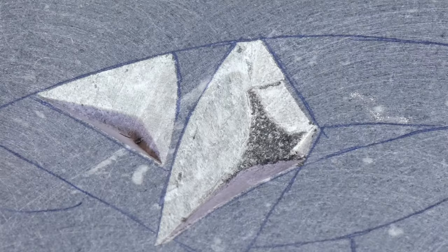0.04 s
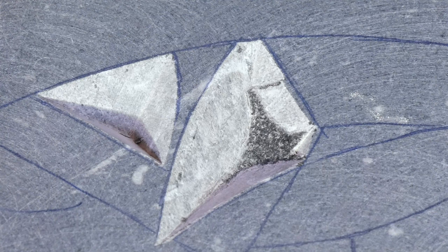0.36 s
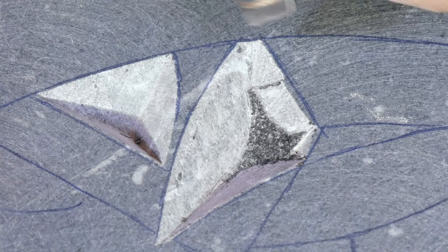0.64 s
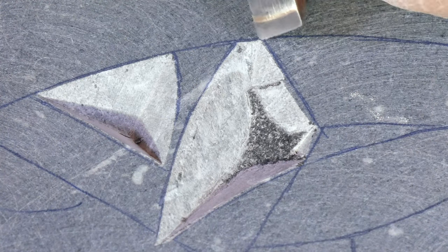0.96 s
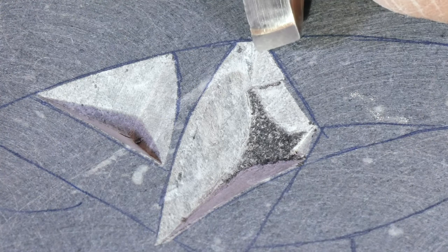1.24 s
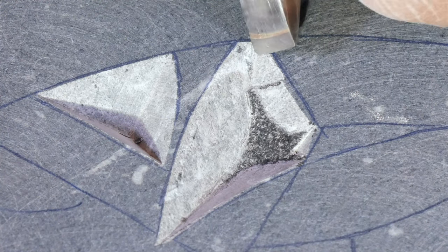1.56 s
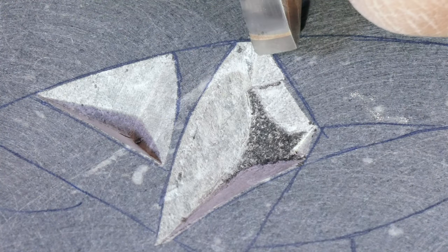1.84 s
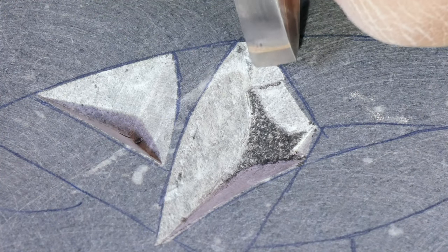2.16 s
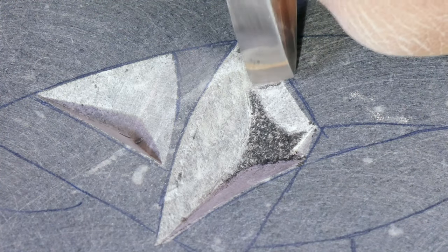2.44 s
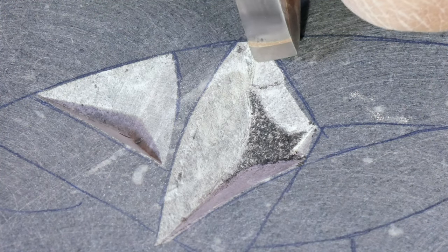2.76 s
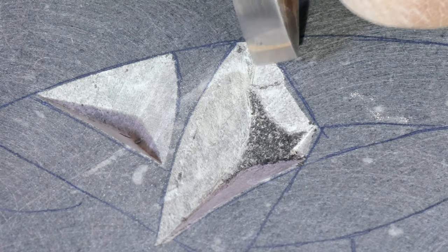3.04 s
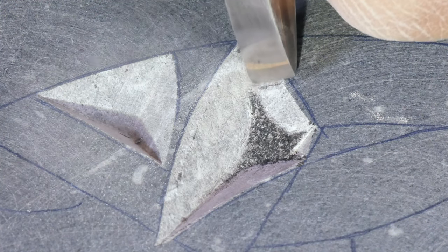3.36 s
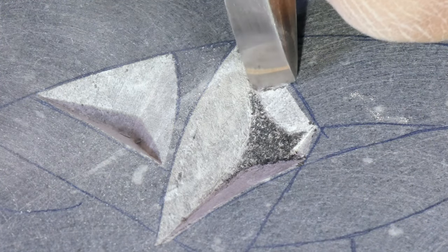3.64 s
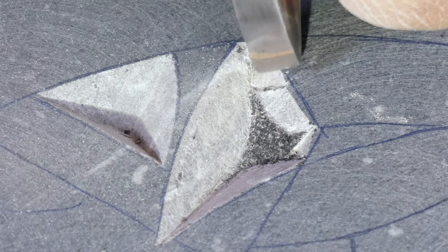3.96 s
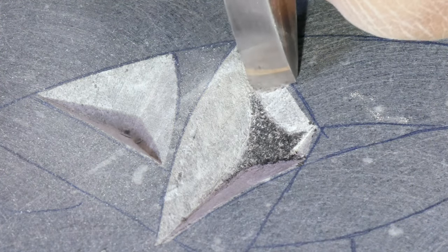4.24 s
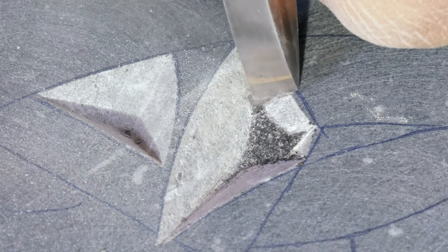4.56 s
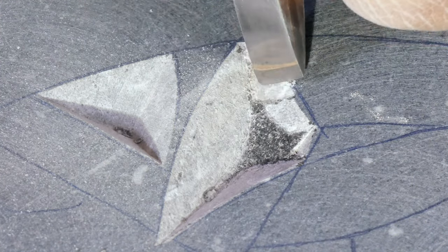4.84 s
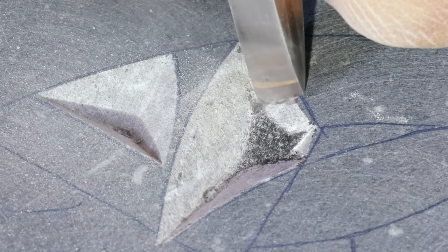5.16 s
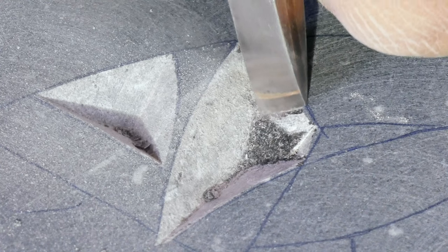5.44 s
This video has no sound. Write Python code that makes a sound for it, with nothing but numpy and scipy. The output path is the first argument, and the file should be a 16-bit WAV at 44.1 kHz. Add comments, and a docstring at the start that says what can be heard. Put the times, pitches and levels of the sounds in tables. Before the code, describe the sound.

A faint air hum gives way to a close pneumatic chisel rattling against stone in three bursts, with bright metallic ringing and hiss.

```python
"""A quiet air machine hums, with wisps of hiss, a thin whistle and two light handling scrapes.
Then a pneumatic hammer drives a steel chisel into stone in three bursts, close by in a small workshop.
Each piston stroke rings the chisel, the exhaust hisses and puffs, and the piston knocks back;
the loose shank rattles when the tool lifts."""
import sys
import numpy as np
from scipy import signal
from scipy.fft import rfft, irfft
from scipy.io import wavfile
from scipy.ndimage import uniform_filter1d

SR = 44100
rng = np.random.default_rng(int(sys.argv[2]) if len(sys.argv) > 2 else 0)


def unload_wav(signal):
    """Save mono or channel-first audio to the path in sys.argv[1] as 16-bit WAV at rate SR, clipped to [-1, 1]."""
    wavfile.write(
        sys.argv[1],
        SR,
        np.round(np.clip(np.atleast_2d(signal).T, -1, 1) * 32767).astype(np.int16),
    )


N = 250929
SIZE = 2048  # samples in one hit
HZ, T = np.fft.rfftfreq(SIZE, 1 / SR), np.arange(N) / SR
TILT_OCTAVES = np.log2(np.maximum(HZ, 1500) / 6000)  # brightness pivots at 6 kHz

# piston pace, one curve per push into the stone, from first bite to lift: time_s, strokes_per_s
PISTON_PACE = [
    [(1.9879, 38.8), (2.05, 29.9), (2.21, 37.0)],
    [(2.2252, 41.1), (2.44, 45.1), (2.56, 31.8), (2.61, 22.9)],
    [(3.0514, 35.4), (3.12, 44.0), (3.27, 37.6), (3.31, 43.6), (3.55, 49.8), (3.67, 29.9), (3.74, 16.6)],
    [(4.0221, 44.4), (4.14, 39.7), (4.22, 42.0)],
    [(4.239, 44.9), (4.3, 51.8), (4.38, 43.7), (4.44, 49.7), (4.61, 48.9), (4.76, 36.7), (4.79, 28.3),
     (4.94, 23.5)],
    [(4.9863, 43.7), (5.04, 50.2), (5.12, 43.1), (5.3, 50.1), (5.43, 43.9), (5.51, 45.2), (5.56, 32.7),
     (5.69, 28.9)],
]
# air valve openings: open_s, attack_s, ease_off_s, release_s,
# hiss_db, hiss_after_db, puff_db, puff_after_db
VALVE_OPENINGS = [(1.91, 0.044, 2.632, 0.16, -32.5, -63.5, -31, -63),
                  (2.921, 0.072, 3.723, 0.14, -32.5, -60.5, -32.5, -68),
                  (3.932, 0.056, 4.75, 0.187, -32.5, -53, -36.5, -39.5),
                  (4.9, 0.03, 5.45, 0.19, -36, -52.5, -48, -45)]
AIR_ON_S = VALVE_OPENINGS[0][0]
# fade of the idling air machine: time_s, level_db
HUM_FADE = [(.55, -51), (.95, -56), (1.3, -59), (1.85, -62)]


def chisel(level_db=22.0, lead_s=.00035, drift=0.0025, uneven_db=1.45):
    """Each blow rings the chisel's resonances; their mix follows how the edge sits in the stone."""
    # resonances, by how much edge cuts: pitch_hz, width_hz, corner_db, half_edge_db, full_edge_db
    resonances = [(1140, 420, 2.5, 0, 1), (1980, 660, 2, -1.5, -2.5), (3390, 530, 5.5, 5.5, 6.5),
                  (4460, 170, 6, 8.5, 2), (5074, 470, 13, 14.5, 11.5), (7660, 200, 5, 11, 8.5),
                  (8340, 1150, 0, 6, 10.5), (9790, 260, 7, 8, 12), (10520, 164, -8, 5, 13.5),
                  (11930, 1100, 9.5, 4, -5), (12180, 470, 0, 7.5, 14), (13040, 630, 3, 12.5, 13.5),
                  (13700, 280, 5, 0, -3), (14580, 280, 17, 9, 14.5)]
    # narrow dips and one small peak in the chisel's ring: pitch_hz, width_hz, gain_db
    ring_eq = [(1560, 200, -2.5), (2570, 330, -6.5), (3960, 150, 5), (7840, 91, -23), (9160, 120, -4),
               (11740, 110, -2)]
    # how much of the edge is in the stone: time_s, share (0-1)
    seating = [(2.55, 0.06), (3.05, 0.47), (3.6, 0.58), (4.05, 0.94), (5.47, 0.97)]
    out = np.zeros(N)
    hz, width, corner_db, half_db, edge_db = np.transpose(resonances)
    eq_db = sum(db / (1 + (2 * (HZ - f) / w) ** 2) for f, w, db in ring_eq)
    for s, db, brightness in blows():
        seat = np.clip(curve(seating, s), 0, 1)
        mix_db = half_db + abs(2 * seat - 1) * ((edge_db if seat > .5 else corner_db) - half_db)
        # the changing contact with the stone pulls and damps each resonance a little
        pull, damp = rng.standard_normal((2, len(hz)))
        offset_hz = HZ[:, None] - hz * (1 + drift * pull)
        peaks = 1 / (1 + (offset_hz / (0.87 * width)) ** 2) ** 2
        body_db = 10 * np.log10(peaks @ amp(mix_db + uneven_db * damp) ** 2) + eq_db
        add(out, s - lead_s, amp(db + level_db) * ring(strike(), body_db + brightness * TILT_OCTAVES))
    return out


def strike(contact_s=0.0007, smear_s=0.0002, scatter_s=0.0029, scatter_db=-5.5):
    """One piston blow: a hard click, smeared as it runs down the steel, then scatter off the slab."""
    delay_s = contact_s + smear_s * unit_rms(uniform_filter1d(rng.standard_normal(len(HZ)), size=70))
    click = irfft(np.exp(-2j * np.pi * np.cumsum(delay_s) * HZ[1]))
    t = T[:SIZE]
    scatter = rng.standard_normal(SIZE) * np.clip(t / contact_s - 1, 0, 1) * np.exp(-t / scatter_s)
    return click + amp(scatter_db) * scatter / np.linalg.norm(scatter)


def blows(bite_s=0.035, lift_s=0.041, glance_db=-8, uneven_db=0.7, tilt_per_db=0.082):
    """Time, level and tilt of each blow: a push bites, leans and lifts; harder is brighter."""
    # pushes into the stone: level_db, bite_db, lean_db_per_s, lift_db, tilt_db_per_octave
    pushes = [(-20, 6, 9, 0, 0.7), (-19.5, 5.5, 7, -5, 0.4), (-17.5, 4, 1.5, -8.5, 0.64),
              (-19, 4.5, 9, -2, 0.5), (-17, 2.5, -3, 9.5, 0), (-20, 6.5, 9, 2.5, 2)]
    # the piston barely reaches the chisel: time_s
    glances = [2.368, 2.506, 4.215, 4.85, 5.329]
    rows = []
    for pace, (level, bite, lean, lift, tilt) in zip(PISTON_PACE, pushes):
        s = strokes(pace)
        supply_db, _ = air(s)
        glancing = abs(s[:, None] - glances).min(axis=1) < .5 / curve(pace, s)
        db = bite * np.exp((s[0] - s) / bite_s) + lean * (s - s[0]) + lift * np.exp((s - s[-1]) / lift_s)
        db += supply_db - np.median(supply_db)
        db += glance_db * glancing + uneven_db * rng.standard_normal(len(s))
        rows += zip(s, level + db, tilt + tilt_per_db * db)
    return rows


def strokes(pace):
    """The moments at which the piston completes a cycle and strikes."""
    t = np.arange(pace[0][0], pace[-1][0], 1 / SR)
    turns = np.cumsum(curve(pace, t)) / SR
    return np.interp(np.arange(turns[-1]), turns, t)


def cycles(longest_s=.036):
    """Start and capped length of each striking piston cycle."""
    start = np.concatenate([strokes(pace) for pace in PISTON_PACE])
    return start, np.minimum(np.diff(start, append=start[-1] + 1), longest_s)


def free_cycles(period_s=.027):
    """Off the stone the piston still shuttles: start and length of those cycles."""
    start = np.arange(AIR_ON_S, T[-1], period_s)
    start = start[abs(start[:, None] - cycles()[0]).min(axis=1) > period_s]
    return start, np.full(len(start), period_s)


def air(t, crack_open_db=-48):
    """Hiss and puff envelopes in dB: each valve opening rises, bows and sags while held, then falls."""
    arch_db, sag_db_per_s = np.array([1.5, -0.5]), np.array([2, 9.5])  # each: hiss, puffs
    rows = [(AIR_ON_S, crack_open_db, crack_open_db)]
    for opens, attack, eases, release, hiss, hiss_after, puff, puff_after in VALVE_OPENINGS:
        full_db, held_s = np.array([hiss, puff]), eases - opens - attack
        rows.append((opens, *rows[-1][1:]))
        for share in np.linspace(0, 1, 9):
            held_db = full_db + arch_db * np.sin(np.pi * share) - sag_db_per_s * share * held_s
            rows.append((opens + attack + share * held_s, *held_db))
        rows.append((eases + release, hiss_after, puff_after))
    return curve(rows, t), curve(rows, t, column=2)


def exhaust(throb_db=2, open_share=0.81, flutter_db=3.0, split_hz=6500, dulling=0.3):
    """Air hisses from the port, swelling once in each cycle; a weak jet loses its treble first."""
    # tone of the jet: frequency_hz, gain_db
    jet_eq = [(80, -53), (170, -12), (300, -1.5), (800, -5.5), (1200, -5.5), (3200, 2), (5000, 4.5),
              (6800, -3), (11000, -5.5), (14700, -3.5), (15900, -37)]
    start, _ = cycles()
    jet_db, _ = air(T)
    turns = np.interp(T, start, np.arange(len(start)))
    throb = throb_db * np.cos(2 * np.pi * (turns - open_share))
    flutter = flutter_db * unit_rms(uniform_filter1d(rng.standard_normal(N), size=200))
    hiss = coloured(rng.standard_normal(N), jet_eq)
    dull = signal.sosfiltfilt(signal.butter(2, split_hz, fs=SR, output="sos"), hiss)
    treble = amp(dulling * (jet_db - jet_db.max())) * (hiss - dull)
    return (T > AIR_ON_S) * amp(jet_db + throb + flutter) * (dull + treble)


def puffs(puff_db=24, thud_db=19, uneven_db=1.96, delay_s=0.00051, swirl_s=0.0035,
          late_s=3.9, late_pitch=1.026):
    """Low puffs of air as the piston passes its ports, and soft thuds when it strikes slowly."""
    # where the piston passes its ports: cycle_share, level_db
    ports = [(0, -1.5), (0.308, -13), (.52, 0), (.79, -10)]
    # slow, heavy strokes, mostly as the air comes and goes: start_s, level_db
    thuds = [(1.586, -56), (1.919, -33.5), (2.193, -26), (2.709, -31), (2.795, -30.5), (2.931, -30.5),
             (3.684, -26.5), (3.728, -31), (3.851, -41.5), (3.928, -29.5), (4.698, -27.5), (4.774, -26.5)]
    # tone of a puff: frequency_hz, gain_db
    puff_eq = [(50, -49), (95, -29), (135, -15), (165, -8.5), (215, -6.5), (275, 3.5), (390, 3),
               (490, -1.5), (800, -7.5), (1100, -36), (4000, -44)]
    start, length = np.hstack([cycles(), free_cycles()])
    strength_db = air(start)[1] + waver(start + length / 2) + puff_db
    pulses = [pulse for share, db in ports for pulse in zip(start + share * length, strength_db + db)]
    pulses += [(s + 0.00381, db + thud_db) for s, db in thuds]
    force, impulse, fade = np.zeros(N), signal.unit_impulse(SIZE), np.exp(-T[:SIZE] / swirl_s)
    for s, db in pulses:
        gain = amp(db + uneven_db * rng.standard_normal())
        swirl = rng.standard_normal(SIZE) * fade  # turbulence follows each clean pulse
        add(force, s + delay_s, gain * (impulse + .5 * swirl / np.linalg.norm(swirl)))
    late = T > late_s  # from here the puffs sit slightly higher
    return sum(signal.oaconvolve(part, ring(impulse, spectrum(puff_eq, HZ / pitch)))[:N]
               for part, pitch in [(force * ~late, 1), (force * late, late_pitch)])


def waver(t, depth_db=4, from_s=4.1, crest_s=4.53, rate_hz=4.8):
    """Tremolo in dB: late in the work the puffs swell and sink."""
    return depth_db * (t > from_s) * np.cos(2 * np.pi * rate_hz * (t - crest_s))


def knocks(rattle_db=15, return_db=3.0, return_share=.55, spread_db=5.5):
    """Dull steel knocks: the loose shank, and the piston's return a little after mid-cycle."""
    # the shank knocks in its socket: start_s, level_db
    rattles = [(1.9113, -27), (2.6323, -19.5), (2.863, -40.5), (2.99, -31), (2.999, -18), (3.015, -7.5),
               (3.04, -11.5), (3.7658, -22), (4.0104, -17), (4.8748, -19.5), (4.9149, -19), (4.95, -20.5),
               (5.666, -29)]
    # tone of a knock: frequency_hz, gain_db
    knock_eq = [(100, -25), (1200, -11), (2700, -4.5), (3100, 0.5), (3600, -3.5), (4800, -3), (7000, -20),
                (16000, -26)]
    out, body_db = np.zeros(N), spectrum(knock_eq, HZ)
    start, length = cycles()
    accent_db = spread_db * np.minimum(rng.standard_normal(len(start)), 1.3)
    back_db = .5 * air(start)[0] + return_db + accent_db  # fades half as fast as the air
    hits = [(s, db + rattle_db) for s, db in rattles] + list(zip(start + return_share * length, back_db))
    forces = chatter(len(hits), likeness=0.43, contact_s=0.00034, scatter_db=-0.5, scatter_s=0.0017)
    for (s, db), force in zip(hits, forces):
        add(out, s, amp(db) * ring(force, body_db))
    return out


def shank(ring_hz=3090, decay_s=0.0027, level_db=-33, return_share=.5, spread_db=2.5):
    """The steel shank pings softly on each stroke and each return, however little air there is."""
    out, t = np.zeros(N), T[:SIZE]
    start, length = cycles()
    for s in np.concatenate([start, start + return_share * length]):
        strength, pull = rng.standard_normal(2)
        ping = np.exp(-t / decay_s) * np.sin(2 * np.pi * ring_hz * (1 + 0.0071 * pull) * t)
        add(out, s, amp(level_db + spread_db * strength) * ping)
    return out


def scrapes():
    """Two light, dry handling scrapes before the work."""
    # touches on the tool: start_s, level_db, tilt_db_per_octave
    touches = [(.131, -28, -4.5), (.506, -24, 8)]
    # tone of a scrape: frequency_hz, gain_db
    scrape_eq = [(800, -22), (3000, 0), (11000, 2), (14000, -23), (15500, -45)]
    out = np.zeros(N)
    forces = chatter(len(touches), likeness=0, contact_s=0.007, scatter_db=-2, scatter_s=0.014,
                     rise_s=0.0025)
    for (s, db, tilt), force in zip(touches, forces):
        add(out, s, amp(db) * ring(force, spectrum(scrape_eq, HZ) + tilt * TILT_OCTAVES))
    return out


def leak():
    """A little air escapes in two short swells."""
    # envelope of the leak: time_s, level_db
    swells = [(.05, -49.5), (.11, -62.5), (.19, -63), (.29, -76.5), (.43, -80), (.52, -56.5), (.58, -66),
              (.68, -81), (1.2, -91)]
    # tone of the leak: frequency_hz, gain_db
    leak_eq = [(100, -8), (600, -6.5), (4200, 11), (6200, 3), (11000, 4), (13500, 1), (15500, -49)]
    return amp(curve(swells, T)) * coloured(rng.standard_normal(N), leak_eq)


def whistle(width_hz=210):
    """Air sings at the closed valve in one narrow resonance that sags and flutters with the flow."""
    # line of the whistle: time_s, pitch_hz, level_db
    line = [(.1, 2410, -61), (.46, 2310, -65.5), (.55, 2370, -67), (.92, 2390, -66), (1.04, 2290, -73),
            (1.13, 2220, -65), (1.23, 2290, -76), (1.41, 2320, -72), (1.51, 2200, -66.5), (1.6, 2330, -76)]
    pole = np.exp(-np.pi * width_hz / SR)
    noise = rng.standard_normal(N) + 1j * rng.standard_normal(N)
    breath = signal.lfilter([1], [1, -2 * pole, pole * pole], noise)
    carrier = np.exp(2j * np.pi * np.cumsum(curve(line, T)) / SR)
    return amp(curve(line, T, column=2)) * unit_rms((breath * carrier).real)


def hum(turns_per_s=23.32):
    """The idling machine repeats one airy churn each turn, with two tones and a soft stereo rush."""
    # tone of churn and rush: frequency_hz, gain_db
    hum_eq = [(45, -44), (120, -23.5), (205, -1.5), (245, -6.5), (470, 3), (570, -4.5), (780, 2.5),
              (1050, -16), (1850, -17.5), (2300, -13), (2800, -22.5), (10000, -35.5), (14000, -51)]
    # steady tones, relative to the churn: pitch_hz, level_db
    partials = [(210, -14), (466, -6)]
    noise = rng.standard_normal(round(SR / turns_per_s))
    one_turn = irfft(np.exp(1j * np.angle(rfft(noise))), len(noise))  # flat spectrum, random phases
    churn = coloured(np.resize(one_turn, N), hum_eq)
    tones = sum(amp(db) * unit_rms(np.sin(2 * np.pi * hz * T)) for hz, db in partials)
    rush = coloured(rng.standard_normal((2, N)), hum_eq)
    return amp(curve(HUM_FADE, T)) * unit_rms(churn + tones + rush)


def idle_taps(per_s=14, tap_hz=500, decay_s=0.0023, level_db=5, spread_db=3):
    """Small soft taps fall at random within the hum and fade with it."""
    out, t = np.zeros(N), T[:SIZE]
    envelope = t / decay_s * np.exp(1 - t / decay_s)
    for place, pitch, strength in rng.random((round(per_s * T[-1]), 3)):
        s = place * T[-1]
        tap = envelope * np.sin(2 * np.pi * tap_hz * 2 ** (pitch - .5) * t)
        add(out, s, amp(curve(HUM_FADE, s) + level_db + spread_db * np.log(strength + 0.066)) * tap)
    return out


def workshop(send, predelay_s=0.0047):
    """Diffuse reflections of a small room, the treble dying first."""
    # reverb time: frequency_hz, t60_s
    decay = [(3500, 0.23), (14000, 0.15)]
    hz, t, noise = signal.stft(rng.standard_normal(SR // 2), SR)
    _, tail = signal.istft(noise * amp(-60 * t / spectrum(decay, hz)[:, None]), SR)
    tail *= np.clip(T[:len(tail)] / predelay_s - 1, 0, 1)
    return signal.fftconvolve(send, tail / np.linalg.norm(tail))[:N]


def chatter(count, likeness, contact_s, scatter_db, scatter_s, rise_s=0.0005):
    """One noisy force per hit: brief contact, then scatter; likeness ties each to the one before."""
    t = T[:SIZE // 2]
    fresh = rng.standard_normal((count + 1, len(t)))
    noise, _ = signal.lfilter([np.sqrt(1 - likeness ** 2)], [1, -likeness], fresh[1:], axis=0,
                              zi=likeness * fresh[:1])
    attack = np.minimum(t / rise_s, 1) ** 2
    return noise * attack * (np.exp(-(t / contact_s) ** 2) + amp(scatter_db) * np.exp(-t / scatter_s))


def ring(force, body_db):
    """Passes a short force through a minimum-phase body; the result has energy 1."""
    log_gain = np.log(amp(np.maximum(body_db, np.max(body_db) - 90)))
    mirrored = np.concatenate([log_gain, log_gain[-2:0:-1]])
    body = np.exp(np.conj(signal.hilbert(mirrored)))[:len(HZ)]
    sound = irfft(rfft(force, SIZE) * body)
    return sound / np.linalg.norm(sound)


def coloured(x, eq):
    """Shapes a full-length sound with an EQ curve, at rms 1."""
    return unit_rms(irfft(rfft(x) * amp(spectrum(eq, np.fft.rfftfreq(N, 1 / SR))), N))


def spectrum(points, hz):
    """Reads a curve on a log-frequency axis."""
    f, value = np.transpose(points)
    return np.interp(np.log(hz + 1), np.log(f + 1), value)


def curve(rows, t, column=1):
    """Reads one column of a control table at the times t."""
    rows = np.asarray(rows, float)
    return np.interp(t, rows[:, 0], rows[:, column])


def add(mix, s, sound):
    """Mixes a sound in at time s."""
    part = mix[max(round(s * SR), 0):][:len(sound)]
    part += sound[:len(part)]


def amp(db):
    """Decibels to gain."""
    return 10 ** (np.asarray(db) / 20)


def unit_rms(x):
    """Scales to rms 1."""
    return x / np.sqrt(np.mean(x ** 2) + 1e-20)


def tool():
    """The hammer, its small noises and its reflections in mono, with fresh noise at each call."""
    steel, hammer, low = chisel(), knocks() + shank() + exhaust(), puffs()
    send = amp(-13) * steel + amp(-12) * hammer + amp(-7) * low
    return steel + hammer + low + leak() + whistle() + scrapes() + workshop(send)


def scene():
    """The tool close in the middle, widened by scattered sound from the sides, over the idling hum."""
    # stereo width, side against mid: frequency_hz, gain_db
    side_eq = [(55, -1), (150, -8.5), (330, -13.5), (1000, -7), (3500, -19), (9000, -12.5)]
    side_gain = amp(spectrum(side_eq, np.fft.rfftfreq(N, 1 / SR)))
    mid = tool()
    side = irfft(1j * rfft(tool()) * side_gain, N)  # a quarter cycle out of step
    return np.array([mid + side, mid - side]) + hum() + idle_taps()


def record(dry):
    """A gentle low cut, then a steep high cut."""
    low_cut_hz, high_cut_hz = 55, 16100
    lean = signal.sosfilt(signal.butter(2, low_cut_hz, "highpass", fs=SR, output="sos"), dry)
    high_cut = signal.firwin(255, high_cut_hz, window=("kaiser", 8), fs=SR)
    return signal.oaconvolve(lean, high_cut[None], "same")


dry = scene()
out = record(dry)
unload_wav(out)
```